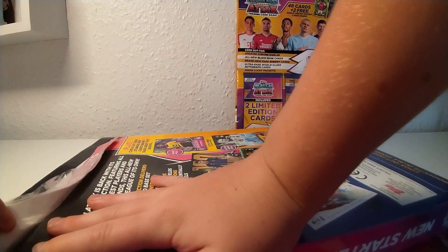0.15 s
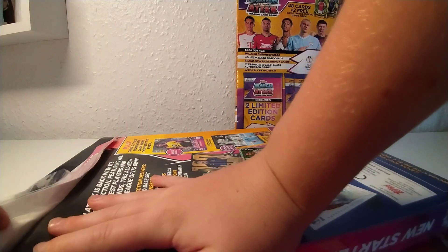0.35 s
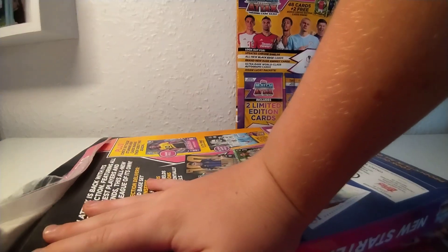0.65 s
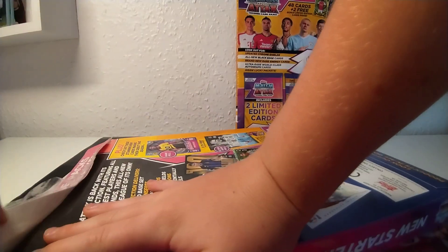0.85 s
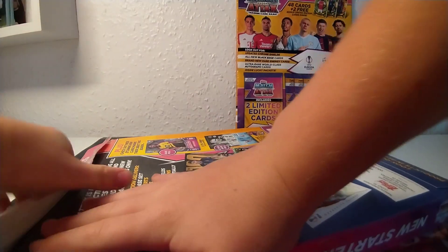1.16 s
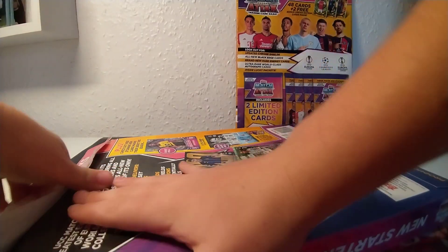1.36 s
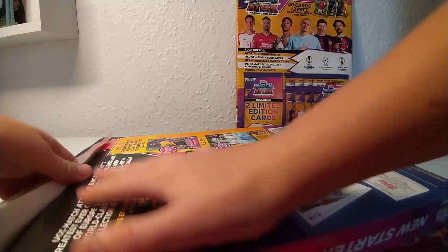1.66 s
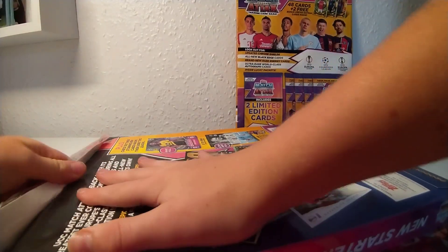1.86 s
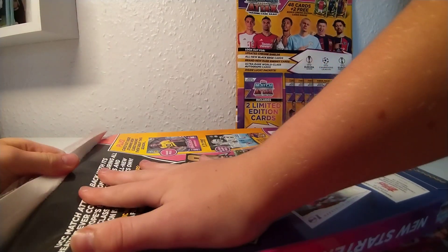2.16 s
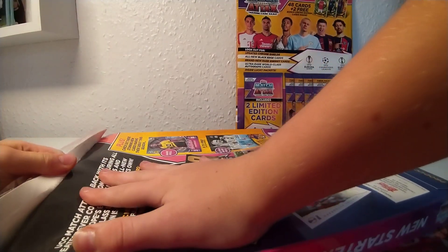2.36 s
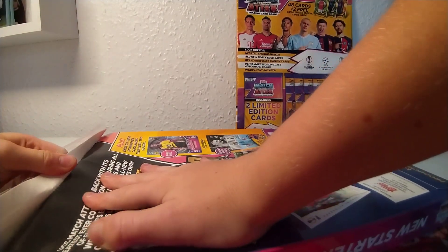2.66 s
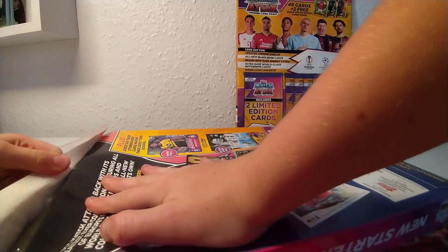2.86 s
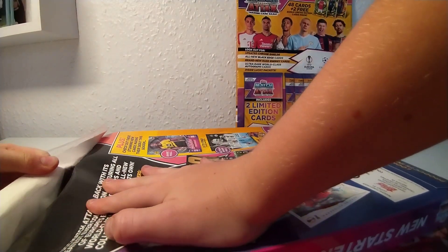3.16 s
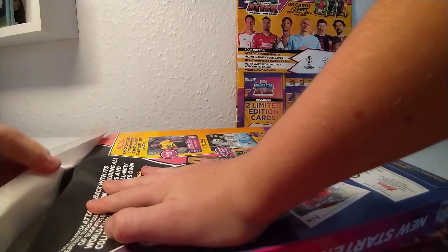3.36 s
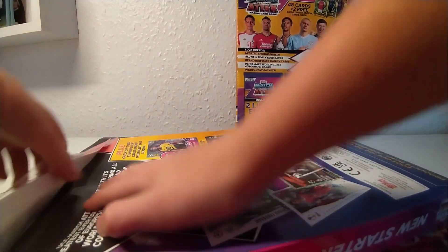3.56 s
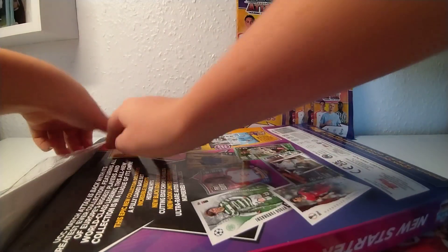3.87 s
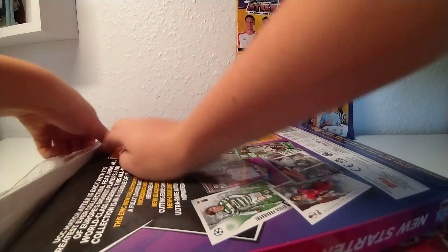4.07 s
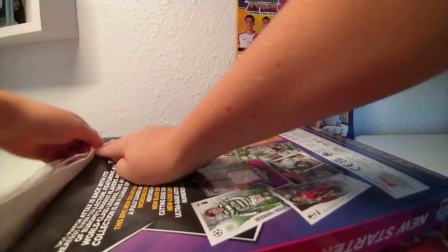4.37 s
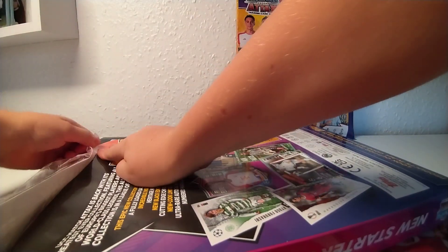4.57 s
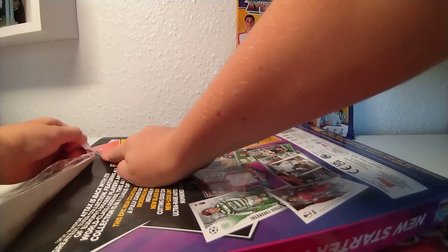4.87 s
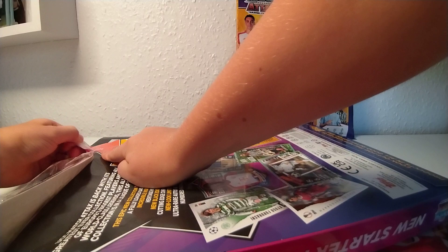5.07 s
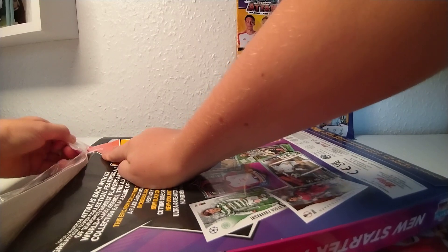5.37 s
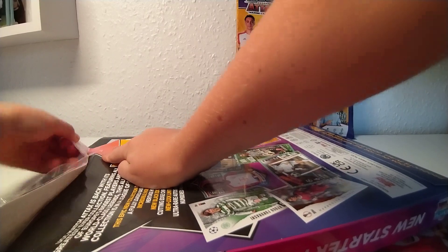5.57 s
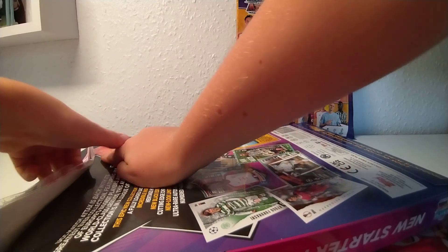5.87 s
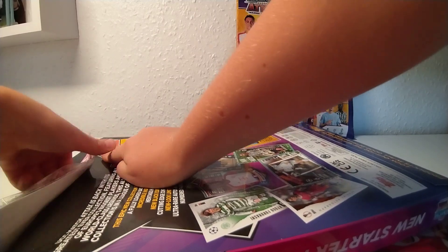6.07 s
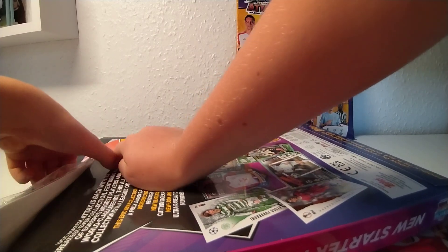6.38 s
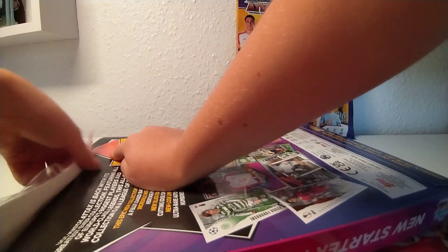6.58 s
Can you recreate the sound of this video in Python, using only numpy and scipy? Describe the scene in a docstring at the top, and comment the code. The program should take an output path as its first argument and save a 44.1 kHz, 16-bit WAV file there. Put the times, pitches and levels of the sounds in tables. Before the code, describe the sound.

Close, bright tearing of tape and plastic film from a box, in uneven pulls broken by hand bumps and quiet gaps indoors.

```python
"""Peeling tape off a cardboard box

Adhesive tape and plastic film are pulled off a box on a table, in a small room, close to the microphones.
Glue threads part as dense clumps of clicks, coloured into crackle, sizzle and fizz; film snaps are noise bursts.
Hands rub (band-passed grains), judder (slip pulses) and knock, and the hollow box rings as a set of modes.
Short room reflections and a hush with a faint whine surround it all.
"""
import sys
import numpy as np
from scipy import signal
from scipy.fft import rfft, irfft
from scipy.io import wavfile
from scipy.ndimage import uniform_filter1d

SR = 44100
rng = np.random.default_rng(int(sys.argv[2]) if len(sys.argv) > 2 else 0)


def generate_wav(signal):
    """Clip the signal to [-1, 1] and save it as 16-bit WAV at the path in sys.argv[1]."""
    frames = np.transpose(np.atleast_2d(signal))
    scaled = np.clip(frames, -1, 1) * 32767
    pcm = np.round(scaled).astype(np.int16)
    wavfile.write(sys.argv[1], SR, pcm)


N = 296352
TIME = np.arange(N) / SR

# room hush: (frequency [Hz], colour [dB])
HUSH_COLOUR = [(25, 0.5), (60, 2.5), (130, 6), (220, 4.5), (400, -3.5), (700, -19), (1500, -17.5),
               (3200, -22.5), (5000, -21), (8000, -29), (14000, -21.5)]
HUSH_DB = -77.5
WHINE_HZ, WHINE_WIDTH_HZ, WHINE_DB = 2640, 130, -87

# crackle through each pull of the tape, ahead of PULL_GAIN_DB: (time [s], level [dB])
FIRST_PEEL = [(0.0, -58.5), (0.061, -59.5), (0.121, -47), (0.203, -53.5), (0.466, -44), (0.587, -55),
              (0.628, -45.5), (0.668, -44.5), (0.81, -59.5)]
TUG = [(1.48, -47.5), (1.54, -42.5), (1.56, -46.5), (1.68, -47), (1.74, -63)]
SHORT_TUG = [(1.97, -52), (2.032, -60), (2.053, -45.5), (2.178, -59.5), (2.24, -72)]
CREEP = [(2.26, -69), (2.363, -67), (2.486, -56.5), (2.589, -60.5), (2.651, -50.5), (2.733, -66),
         (2.753, -54), (2.815, -51.0)]
RIP = [(2.835, -42), (2.918, -41.0), (3.021, -51.5), (3.063, -45), (3.084, -37.5), (3.166, -49.5),
       (3.187, -37), (3.27, -58)]
SECOND_RIP = [(4.575, -61.5), (4.679, -68.5), (4.741, -59.5), (4.803, -49), (4.845, -44), (4.928, -36),
              (4.99, -59)]
LAST_PEEL = [(5.06, -63.5), (5.1, -57.5), (5.14, -59.5), (5.22, -39.5), (5.28, -55.5), (5.36, -44.5),
             (5.4, -59.5), (5.56, -53.5)]
LAST_TUG = [(6.565, -67.5), (6.586, -72.5), (6.608, -48.5), (6.715, -46.5)]
# the pulls: (level curve, relative treble [dB], fine threads [dB], relative box rumble [dB],
# left over right [dB])
PULLS = [(FIRST_PEEL, 5, -5.5, -13, -4), (TUG, 4.4, -11.5, -3, -1.2), (SHORT_TUG, 1.6, -2.5, -1.5, -1.5),
         (CREEP, 5.4, -3, -20, -5), (RIP, 1, -9.5, -10, 0), (SECOND_RIP, 5.7, -11.5, -16, 1.2),
         (LAST_PEEL, 6.1, -9, -14.5, -2), (LAST_TUG, 1.3, -3.5, -7.5, -2.5)]
PULL_GAIN_DB = 5
# hands make the film rustle: (time [s], length [s], level [dB], relative treble [dB],
# relative box rumble [dB])
RUSTLES = [(0.908, .03, -54, -8, 9), (1.021, 0.016, -52.5, -8, 9.5), (1.177, 0.045, -49, 0, 6.5),
           (1.258, 0.16, -59.5, -0.5, 7), (1.323, 0.019, -52, 1, 8.5), (1.096, .07, -74, -2, 5),
           (1.61, 0.11, -47.5, -9, 2), (1.829, 0.015, -63, 2.5, 9.5), (3.331, 0.036, -46.5, 1.5, -12),
           (3.521, 0.018, -57, -4.5, 1), (3.597, 0.062, -44, -1.5, 1.5), (3.717, 0.027, -38, -1.5, 2.5),
           (3.883, .08, -68, -6.5, 3), (4.038, .04, -63.5, -3.5, 0), (4.099, 0.036, -52, 8, 8.5),
           (4.182, 0.066, -50, 7, 11.5), (4.244, 0.035, -35.5, 3, 2.5), (4.508, 0.028, -69.5, 5.5, -7.5),
           (4.875, 0.063, -39.5, 3.5, 6.5), (5.577, 0.023, -40, -1, 0.5), (5.792, 0.019, -38.5, 1, 5),
           (6.231, 0.0071, -69, 12.5, -2), (6.355, 0.022, -70, -6, 22), (6.422, 0.01, -46, 0, 10),
           (6.688, 0.026, -46.5, -8, 15.5)]
# a rustle weakens as it goes on, and parts few fine threads
RUSTLE_SAG_DB, RUSTLE_FINE_DB, RUSTLE_PAN_DB = 3, -20.5, -0.6
GRIP_DB_PER_S = 1500  # how fast any movement sets in
# the crackle stops with the pull; a hand comes to rest more slowly
PULL_RELEASE_DB_PER_S, HAND_RELEASE_DB_PER_S = 600, 330.5

# body of the parting threads: (frequency [Hz], colour [dB])
CRACKLE_COLOUR = [(150, -29), (350, 2), (600, 2), (900, 3), (1500, 6), (2400, 0.5), (3300, -2), (4500, 2.5),
                  (8000, -36.5)]
# treble of the parting threads: (frequency [Hz], colour [dB])
SIZZLE_COLOUR = [(1500, -44), (2800, -4), (4000, -2.5), (5500, 0), (8000, -2), (11000, -1.5), (14000, 1)]
# finest glue threads: (frequency [Hz], colour [dB])
FIZZ_COLOUR = [(3000, -33.5), (5500, -14.5), (7500, 3), (9000, 1.5), (11000, -5), (14000, -3)]

# modes of the hollow box: (frequency [Hz], relative level [dB], t60 [s])
BOX_MODES = [(92, -13.5, 0.18), (130.4, 1, 0.14), (170, -26, .08), (217.5, 2.5, 0.14), (278, -16.5, 0.086),
             (321.2, 8.5, 0.099), (392.7, 1.5, 0.14), (476, -13.5, 0.028), (622, -15.5, 0.061),
             (644, -7.5, 0.16), (786, -9.5, .12), (1133, -12, .07), (1280, 4.5, 0.088)]
# shaken flat panels: (frequency [Hz], colour [dB])
RUMBLE_COLOUR = [(25, -24.5), (55, -16.5), (85, -5.5), (135, 7.5), (175, 1.5), (215, -4), (330, 3),
                 (480, -4), (700, -8), (1200, -18.5), (3000, -51)]
# cardboard panel resonances: (centre [Hz], half-width [Hz], lift [dB])
PANEL_RESONANCES = [(596, 28, 2), (740, 28, -2), (944, 49, -6), (1270, 240, 0.5), (1450, 45, -2.5),
                    (1561, 89, 1.5), (2760, 77, -0.5), (3275, 410, -4.5), (4100, 410, 0.5)]

# the film buckles with a snap: (time [s], relative strength [dB], relative treble [dB], relative bass [dB])
SNAPS = [(0.1012, -7.5, -3.5, -5), (0.3072, -10, 3, -8), (0.4021, -7, 0, 9), (0.4187, -3.5, -3, -6),
         (0.4437, -4, 5, 7.5), (0.4618, -3.5, 2, -9), (0.554, -21, 16, 11), (1.32, 1, -7.5, 3),
         (1.518, -10, 13.5, 10), (1.5295, -2, -8, 1), (1.5443, 0, 7, -23), (1.6042, 2, -16.5, 0),
         (2.0117, -16, 11.5, -30), (2.0486, 14.5, -14.5, -14), (2.5707, -14, 4, -22),
         (2.8311, 4, -0.5, 3.5), (2.8401, 16, -10, -25), (2.8824, -1.5, 0.5, 5), (2.9059, 1, 1.5, 4),
         (2.9197, 10, -3.5, 2), (2.9949, -3, -1.5, 0), (3.1327, 5.5, -9, -21), (3.1712, 3, -7, -24),
         (3.1937, -0.5, 3, -6), (3.3688, -9, -9, -15.5), (3.463, -35.5, -4.5, -10),
         (3.5966, 5.5, -7.5, -10), (3.6371, 1.5, -9, 7), (3.6867, -7, -1.5, -6.5), (3.7144, 9.5, -9, 1),
         (4.0425, -27.5, 8, 10), (4.2881, -5, 11, 6.5), (4.3143, -7.5, 5.5, -13), (4.4689, -29.5, 2, -7),
         (4.6406, -16.5, 1, -19), (4.7957, 0.5, 2, -32), (4.9068, 14, -2.5, 5), (5.5766, 5.5, -6, 17),
         (5.7928, 0, -3.5, 13.5), (5.805, -2.5, -3, -1), (6.0895, -42.5, 12, -12), (6.1662, -33, -2, -24),
         (6.3431, -14, -14, 9), (6.417, -6, -10, 7.5), (6.5614, -14, -0.5, -1.5), (6.6011, -11, 6, -6),
         (6.6681, -2.5, 2.5, -15), (6.7022, 1.5, -2, 0)]
# a fingertip scuffs the film: (time [s], relative strength [dB], relative treble [dB], relative bass [dB])
SCUFFS = [(0.9078, -14, -10, -3), (0.921, -9.5, -9.5, 3), (0.9948, -8.5, -12, 6), (1.0278, -5, -13, 8.5),
          (1.0379, -4, -7, 2), (1.375, -17, -14, 0), (1.4689, -27, 18.5, 1), (1.4814, -4.5, -0.5, -22),
          (3.5759, -14.5, -11, -3), (4.0921, -18.5, 4, 5), (5.7802, -3, -11.5, 7.5),
          (6.2225, -20, -3.5, -34)]
# snaps and scuffs alike: (frequency [Hz], colour [dB])
SNAP_COLOUR = [(30, -28.5), (70, -21.5), (140, -2), (400, 1.5), (900, -0.5), (1500, 1.5), (2300, -1.5),
               (3400, -2.5), (5000, 1), (9000, 2), (14000, 2.5)]
SNAP_DECAY_S, SCUFF_DECAY_S = 0.00041, .0042

# fingers drag over cardboard: (middle [s], reach to either side [s], level [dB], centre [Hz])
RUBS = [(0.672, 0.14, -47, 680), (1.043, 0.013, -41.5, 580), (1.218, 0.016, -44, 750),
        (1.67, 0.1, -49, 496), (2.117, 0.016, -35, 402), (2.153, 0.037, -42.5, 414),
        (4.119, 0.0093, -29, 850), (4.203, 0.035, -35, 800), (4.264, 0.041, -31, 680),
        (6.433, 0.029, -46, 450), (6.71, 0.031, -38, 390)]
# hands knock on the box: (time [s], strength [dB], softness [Hz], lower is softer)
KNOCKS = [(.92, -52.5, 400), (1.324, -42.5, 510), (1.902, -48.5, 295), (2.84, -39.5, 410),
          (3.637, -45, 500), (3.715, -38.5, 610), (4.616, -57.5, 596), (5.5752, -22, 418),
          (5.792, -33.5, 400), (5.808, -32, 301), (5.896, -49, 252), (6.2232, -54.5, 298),
          (6.348, -38.5, 402)]
# the palm judders along the box: (time [s], length [s], level [dB], mean slip rate [1/s])
JUDDERS = [(1.596, 0.12, -42, 142), (4.186, 0.099, -44.5, 150)]
# juddering cardboard: (frequency [Hz], colour [dB])
JUDDER_COLOUR = [(60, -25.5), (140, 2.5), (300, 1), (600, -6), (900, -10.5), (1400, -18.5), (3000, -43)]

# decay of the room: (frequency [Hz], t60 [s])
ROOM_T60 = [(150, 0.17), (700, 0.13), (2000, 0.17), (5500, 0.17), (13000, 0.13)]
# each microphone sits behind a small resonant port; left: (frequency [Hz], colour [dB])
PORT_LEFT = [(100, -4.5), (3500, 4), (4800, 1.5), (5600, 13), (6800, 4), (8000, -12), (10000, -12),
             (14000, -18.5)]
# right port: (frequency [Hz], colour [dB])
PORT_RIGHT = [(100, -2), (3500, 3.5), (5000, -0.5), (5800, 10), (6600, 2), (8200, 14), (10000, 1),
              (12500, -7.5), (14000, -14.5)]
LEFT_LAG_S, CUTOFF_HZ = .00038, 14700


def from_db(db):
    """Decibels to gain."""
    return 10 ** (np.asarray(db) / 20)


def rms_one(x):
    """Scale to an rms of 1."""
    return x / np.sqrt(np.mean(x ** 2) + 1e-20)


def at_hz(points, hz):
    """Read a table on a log-frequency axis."""
    f, value = np.transpose(points)
    return np.interp(np.log(np.maximum(hz, 1)), np.log(f), value)


def coloured(x, *spectra, size=4096):
    """Causal (minimum-phase) filter with the summed dB of the spectra."""
    hz = np.arange(size // 2 + 1) * SR / size
    gain_db = sum(at_hz(s, hz) for s in spectra)
    cepstrum = irfft(np.log(from_db(gain_db)))
    # folding the cepstrum forward in time makes the phase minimal
    cepstrum[1:size // 2] *= 2
    cepstrum[size // 2 + 1:] = 0
    response = np.array(irfft(np.exp(rfft(cepstrum))), ndmin=x.ndim)
    return signal.oaconvolve(x, response, axes=-1)[..., :x.shape[-1]]


def bandpass(x, low, high, order=2):
    """Pass the band between two frequencies in Hz."""
    return signal.sosfilt(signal.butter(order, [low, high], "band", fs=SR, output="sos"), x)


def drift(per_s):
    """Slow chance with a spread of 1."""
    knots = np.arange(0, N / SR + 1, 1 / per_s)
    own_rng = np.random.default_rng(rng.integers(2 ** 31))
    return rms_one(np.interp(TIME, knots, own_rng.standard_normal(len(knots))))


def add(track, s, sound):
    """Mix a sound in at a time."""
    at = int(np.clip(round(s * SR), 0, N - 1))
    track[..., at:at + sound.shape[-1]] += sound[..., :N - at]


def two_sides(alike, count):
    """Left and right random values that are partly the same."""
    common, *own = rng.standard_normal((3, count))
    alike = np.clip(alike, 0, 1)
    return np.sqrt(alike) * common + np.sqrt(1 - alike) * np.array(own)


def grains(per_s, spread_db, clump_db, clumps_per_s, size=1300):
    """Tiny ruptures of uneven size that come in clumps; their power is evened over some 30 ms."""
    born = rng.random(N) < per_s / SR
    own_db = spread_db * np.minimum(rng.standard_normal(N), 2)
    shared_db = clump_db * np.minimum(drift(clumps_per_s), 2)
    clicks = born * from_db(own_db + shared_db) * rng.choice([-1, 1], N)
    return clicks / np.sqrt(np.abs(uniform_filter1d(clicks ** 2, size)) + 1e-6)


def background():
    """The room's hush is coloured noise, with a faint whine of narrow-band noise in it."""
    low, high = WHINE_HZ - WHINE_WIDTH_HZ / 2, WHINE_HZ + WHINE_WIDTH_HZ / 2
    whine = rms_one(bandpass(two_sides(0.46, N), low, high, order=1))
    hush = rms_one(coloured(two_sides(0.3, N), HUSH_COLOUR))
    return from_db(HUSH_DB) * hush + from_db(WHINE_DB) * whine


def movement(curve, release_db_per_s, t):
    """Level in dB of one movement: it grips, follows its curve and is released."""
    s, db = np.transpose(curve)
    grip_db = GRIP_DB_PER_S * np.clip(s[0] - t, 0, .2)
    release_db = release_db_per_s * np.clip(t - s[-1], 0, 1)
    return np.interp(t, s, db) - grip_db - release_db


def handling(size=32):
    """Pulls and rustles add in power; the stronger a movement, the more it sets colour and side. All in dB."""
    t = TIME[::size]
    moves = []
    for curve, *colour in PULLS:
        moves.append((movement(curve, PULL_RELEASE_DB_PER_S, t) + PULL_GAIN_DB, *colour))
    for s, length, db, treble_db, box_db in RUSTLES:
        rustle_db = movement([(s, db), (s + length, db - RUSTLE_SAG_DB)], HAND_RELEASE_DB_PER_S, t)
        moves.append((rustle_db, treble_db, RUSTLE_FINE_DB, box_db, RUSTLE_PAN_DB))
    levels, treble, fine, shake, pan = map(np.array, zip(*moves))
    power = from_db(levels) ** 2
    total = power.sum(axis=0)
    share = power / total
    level_db = 10 * np.log10(total)
    treble_db = 10 * np.log10(from_db(treble) ** 2 @ share)
    shake_db = 10 * np.log10(from_db(shake) ** 2 @ share)
    curves = (level_db, treble_db, fine @ share, shake_db, pan @ share)
    return [np.interp(TIME, t, c) for c in curves]


def scattered(clicks, edges, alike, patchy_db=3.0):
    """Each rupture bends its own patch of film: it has its own strength in every band and towards each side."""
    out, at = np.zeros((2, N)), np.flatnonzero(clicks)
    for low, high in zip(edges, edges[1:]):
        pushes = np.full((2, N), 1e-18)
        flexing = from_db(patchy_db * drift(per_s=30)[at])  # the creases shift, and the colour with them
        pushes[:, at] = clicks[at] * flexing * two_sides(alike, len(at))
        out += bandpass(pushes, low, high)
    return out


def peel(crackle_db, treble_db, fine_db, crackle_trim_db, sizzle_trim_db):
    """Glue threads part, each with a crack in the film; the finest ones add a fizz."""
    threads = grains(per_s=3400, spread_db=3.5, clump_db=3.0, clumps_per_s=330)
    fine = grains(per_s=5000, spread_db=4.5, clump_db=9.0, clumps_per_s=270)
    edges = [150, 500, 900, 1400, 2100, 3000, 4200, 5600, 7200, 9000, 11500, 16000]  # Hz
    crackle = rms_one(coloured(scattered(threads, edges[:8], alike=0.61), CRACKLE_COLOUR))
    sizzle = rms_one(coloured(scattered(threads, edges[4:], alike=0.2), SIZZLE_COLOUR))
    fizz = rms_one(coloured(scattered(fine, edges[6:], alike=0.68), FIZZ_COLOUR))
    treble = from_db(sizzle_trim_db) * sizzle + from_db(fine_db) * fizz
    return from_db(crackle_db) * (from_db(crackle_trim_db) * crackle + from_db(treble_db) * treble)


def free_span(x, trip_s, wander, echo):
    """Cracks run along the loose strip and return, duller; as its length wanders, so do its resonances."""
    lag = np.round(SR * trip_s * np.exp(wander * drift(per_s=5))).astype(int)
    dulled = signal.lfilter(*signal.butter(1, 3000, fs=SR), x)
    returned = dulled[:, np.maximum(np.arange(N) - lag, 0)]
    return x - np.clip(echo, 0, 1) * returned


def box(force):
    """The box's modes are decaying resonators, all driven by one force."""
    out = np.zeros(N)
    for hz, db, t60 in BOX_MODES:
        r = from_db(-60 / (t60 * SR))  # decay per sample
        w = 2 * np.pi * hz / SR
        mode = signal.lfilter([1, -r * np.cos(w)], [1, -2 * r * np.cos(w), r * r], force + 1e-18)
        out += from_db(db) * mode
    return out


def rumble(level_db, ring_db, panel_db):
    """The jerks of the handling shake the box's modes and its flat panels."""
    jerks, drag = [grains(per_s=900, spread_db=4.0, clump_db=3.0, clumps_per_s=70) for _ in range(2)]
    ring = from_db(ring_db) * rms_one(box(jerks))
    panels = from_db(panel_db) * rms_one(coloured(drag, RUMBLE_COLOUR))
    return from_db(level_db) * (ring + panels)


def snaps(rows, crack_s, flutter_s, flutter_db, level_db, alike, size=2048):
    """A sharp crack or a longer scuff, then a few milliseconds of flutter in the freed film."""
    out, t = np.zeros((2, N)), np.arange(size) / SR
    decay = np.exp(-t / crack_s) + from_db(flutter_db) * np.exp(-t / flutter_s)
    shape = (1 - np.exp(-2 * t / crack_s)) * decay
    for s, db, treble_db, bass_db in rows:
        noise = shape * two_sides(alike, size)
        spectrum = rfft(np.roll(noise, shift=size // 128, axis=1))  # room for what the evening spreads ahead
        # even the energy over pitch
        burst = irfft(spectrum / np.sqrt(uniform_filter1d(np.abs(spectrum) ** 2, size=70)))
        burst = burst * (t < t[-1] / 2)
        tilt = [(450, bass_db), (1200, 0.002), (2600, 0.013), (4200, treble_db)]
        add(out, s - .0004, from_db(db + level_db) * coloured(burst, tilt, SNAP_COLOUR))
    return out


def rubs(width, skirt_db):
    """Skin sticks and slips on the cardboard, which sounds in a broad band under the finger."""
    slips = grains(per_s=1500, spread_db=3.0, clump_db=3.0, clumps_per_s=120)
    out = np.zeros(N)
    for s, length, db, hz in RUBS:
        broad = bandpass(slips, hz / (1 + width), hz * (1 + width))
        overtone = bandpass(slips, hz * 1.5, hz * 1.505)
        swell = np.exp(-2 * ((TIME - s) / length) ** 2)
        out += from_db(db) * swell * rms_one(broad + from_db(skirt_db) * overtone)
    return out


def knocks(size=600):
    """A fingertip lands as a soft push: the softer, the duller the thump."""
    force, t = np.zeros(N), np.arange(size) / SR
    for s, db, soft_hz in KNOCKS:
        push = t * np.exp(-2 * np.pi * soft_hz * t)
        add(force, s, from_db(db) * push / push.sum())
    # a small box radiates little deep bass
    return signal.sosfilt(signal.butter(2, 65, "high", fs=SR, output="sos"), box(force))


def judders(wobble, uneven_db):
    """Skin grips and slips at a nearly steady rate, so the cardboard gives a short low groan."""
    out = np.zeros(N)
    for s, length, db, slip_hz in JUDDERS:
        turns = np.cumsum(slip_hz * np.exp(wobble * drift(per_s=25))) / SR
        slips = np.diff(np.floor(turns), prepend=0)  # one pulse a turn
        slips = slips * from_db(uneven_db * drift(per_s=90))
        level_db = movement([(s, db), (s + length, db)], HAND_RELEASE_DB_PER_S, TIME)
        out += from_db(level_db) * rms_one(coloured(slips, JUDDER_COLOUR))
    return out


def on_panel(x):
    """The panel's resonances lift some pitches and swallow others."""
    hz = np.geomspace(200, 8000, 400)
    lift_db = sum(db * np.exp(-((hz - f) / width) ** 2) for f, width, db in PANEL_RESONANCES)
    return coloured(x, list(zip(hz, lift_db)))


def room(x, wet_db, bass_wet_db, build_s, size=16384):
    """Dense reflections build up within milliseconds and decay band by band; each side gets its own."""
    t, hz = np.arange(size) / SR, np.arange(size // 2 + 1) * SR / size
    field = rfft(rng.standard_normal((2, size)))
    centres = [f for f, t60 in ROOM_T60]
    response = 0
    for (f, t60), band in zip(ROOM_T60, np.eye(len(centres))):
        tail = np.exp(-np.log(1000) * t / t60) * (1 - np.exp(-t / build_s))
        response = response + irfft(field * at_hz(list(zip(centres, band)), hz)) * tail
    spectrum = rfft(response)
    # bare walls favour no pitch
    spectrum = spectrum / np.sqrt(uniform_filter1d(np.abs(spectrum) ** 2, size=40))
    gain_db = wet_db + at_hz([(300, bass_wet_db), (1200, 0)], hz)
    response = irfft(spectrum * from_db(gain_db))
    return signal.oaconvolve(x, response * (t > .0015) * (t < .3), axes=1)[:, :N]


def scene():
    """Tape and box lie a little to the right, so the left side hears them later."""
    crackle_db, treble_db, fine_db, box_db, pan_db = handling()
    film = peel(crackle_db, treble_db, fine_db, crackle_trim_db=-2.46, sizzle_trim_db=-2.5)
    film = free_span(film, trip_s=.0025, wander=.2, echo=0.55)
    film = film + snaps(SNAPS, SNAP_DECAY_S, flutter_s=0.0038, flutter_db=-9.0, level_db=-2.0, alike=0.51)
    film = film + snaps(SCUFFS, SCUFF_DECAY_S, flutter_s=0.0098, flutter_db=-23.5, level_db=0.5, alike=0.52)

    body = rumble(crackle_db + box_db, ring_db=-7.0, panel_db=-5.5)
    body = body + rubs(width=0.48, skirt_db=-7.5) + knocks() + judders(wobble=.03, uneven_db=1.5)

    film = film * from_db(np.array([pan_db, -pan_db]) / 2)
    body = body * from_db([[-1.0], [1.0]])
    near = on_panel(film + body)
    near = np.array([np.interp(TIME - LEFT_LAG_S, TIME, near[0]), near[1]])
    return near + room(near, wet_db=-14.0, bass_wet_db=1.5, build_s=0.003) + background()


def record(dry):
    """The two ports colour the sound, the hardest peaks are rounded off, and the top is cut."""
    heard = np.array([coloured(dry[0], PORT_LEFT), coloured(dry[1], PORT_RIGHT)])
    heard = heard / (1 + (heard / .72) ** 6) ** (1 / 6)
    return signal.sosfilt(signal.ellip(10, .3, 80, CUTOFF_HZ, fs=SR, output="sos"), heard)


dry = scene()
out = record(dry)
generate_wav(out)
```